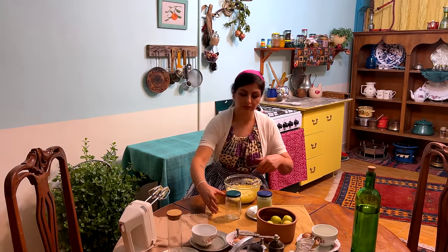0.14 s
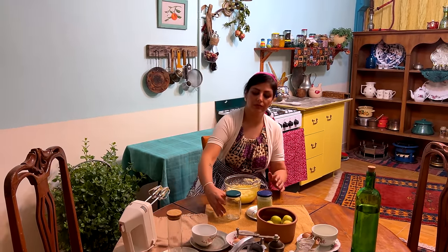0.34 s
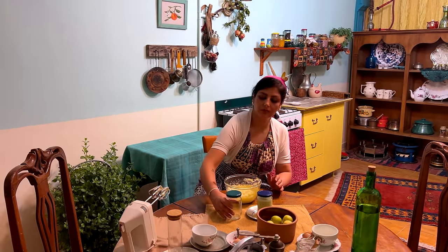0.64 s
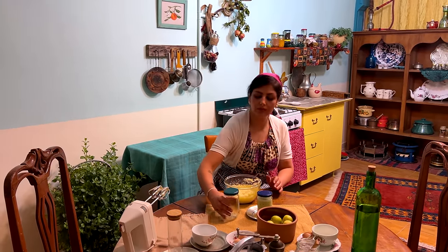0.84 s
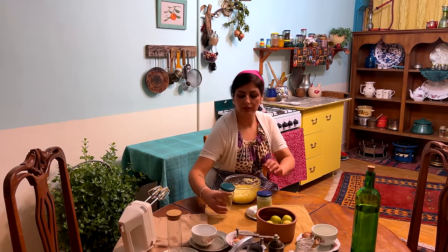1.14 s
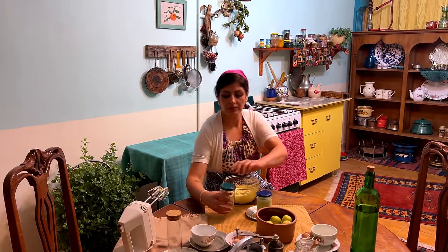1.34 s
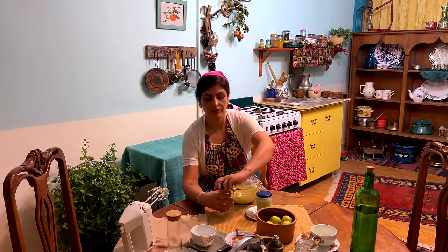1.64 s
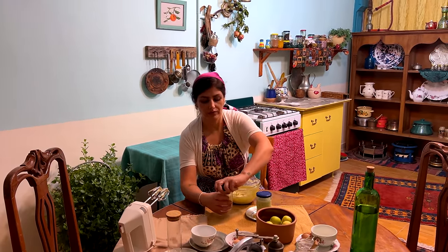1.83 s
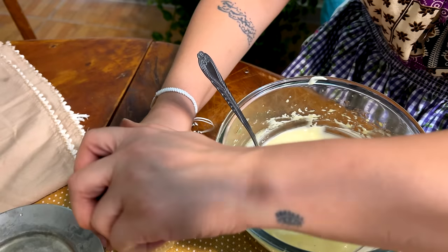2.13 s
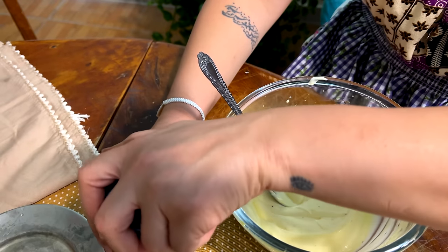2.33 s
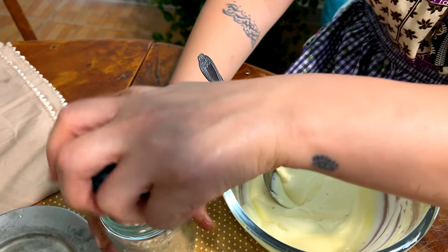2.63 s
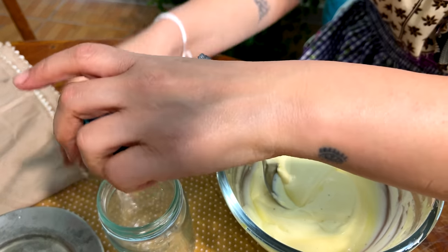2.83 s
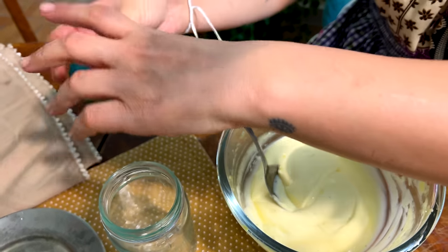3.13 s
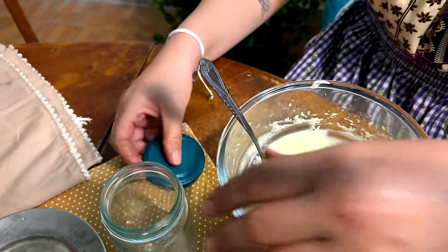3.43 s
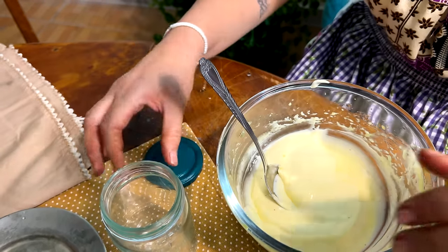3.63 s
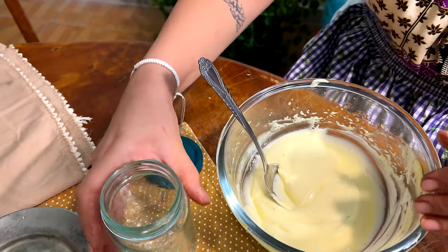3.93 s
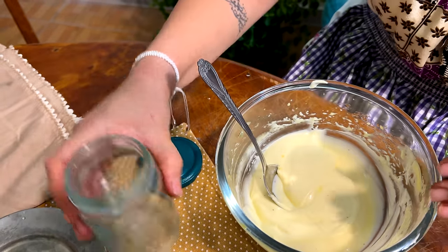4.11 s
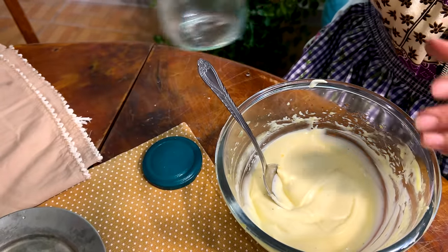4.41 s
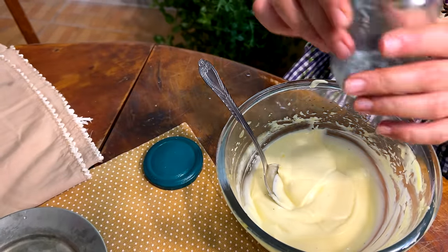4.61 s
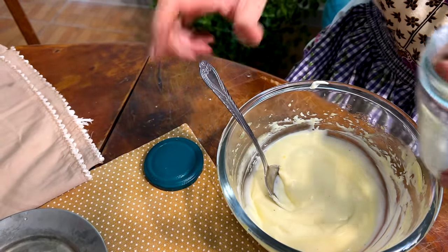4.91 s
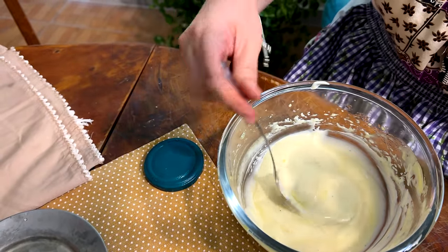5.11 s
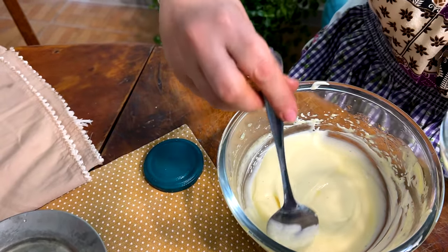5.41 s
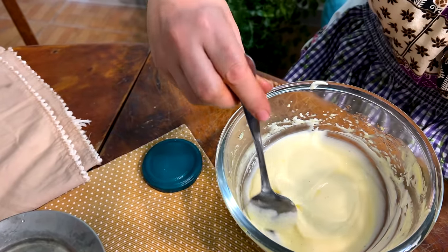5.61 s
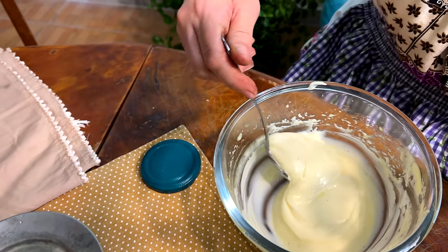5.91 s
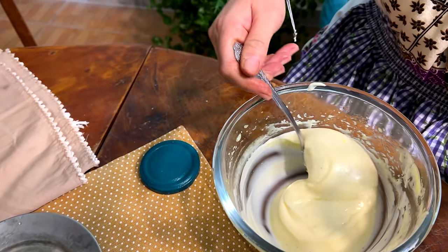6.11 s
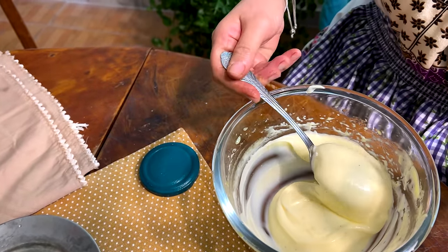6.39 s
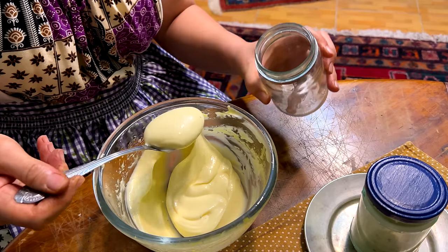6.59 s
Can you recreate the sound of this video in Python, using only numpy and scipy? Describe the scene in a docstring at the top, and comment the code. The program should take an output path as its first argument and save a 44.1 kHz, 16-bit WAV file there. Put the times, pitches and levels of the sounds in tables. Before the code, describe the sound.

A low, quiet room rumble runs throughout. From 0 to 1.9 s, smooth soft swishes swell and fade, the fullest around 0.75-1.4 s, with faint distant knocks at 0.1 and 0.4 s. Close up at about 2.0 s a tin lid rubs on a jar thread; slips and hollow low pops come at 2.17 and 2.27, strongest at 2.35-2.4 as the seal opens. At 2.46 a deep, loud thump of glass on wood, then a tiny squeak and light ticks near 3.1. At 3.4-3.57 the lid rasps, squeaks and taps down on the mat. Faint squeak at 4.05, soft sliding at 4.7, a small spoon stir at 5.05-5.15. At 5.47 the spoon clinks brightly but briefly on the bowl, then scrapes grittily from 5.5 to 6.25 with lesser taps at 5.68 and 5.9, turning thinner and brighter after 6.0. Near quiet follows, with one faint nudge at 6.6.

```python
"""In a kitchen a glass jar is twisted open, bumps the wooden table, and its tin lid is laid down.
A steel spoon then scrapes round a glass bowl and strikes it, damped by thick sauce.
Blows excite decaying modes, with noise for the rough surfaces; rubbing is noise through resonances.
The air in the jar rings as one mode, squeaks are wavering whistles, and a room tail follows most sounds.
Smooth swishes swell and fade at first; a low rumble of shaped noise lies under everything."""
import sys
import numpy as np
from scipy import signal
from scipy.fft import rfft, irfft, next_fast_len
from scipy.io import wavfile
from scipy.ndimage import uniform_filter1d, map_coordinates

SR = 44100
rng = np.random.default_rng(int(sys.argv[2]) if len(sys.argv) > 2 else 0)


def int16_out(signal):
    """Quantize to a 16-bit WAV file."""
    q = np.round(np.clip(np.atleast_2d(signal).T, -1, 1) * 32767)
    wavfile.write(sys.argv[1], SR, q.astype(np.int16))


N = 297675
TIME = np.arange(N) / SR  # s
AGE = TIME[:SR // 2]  # s since a blow; each blow is followed for half a second


def amp(db):
    """Level law: decibels to amplitude gain."""
    return 10 ** (np.asarray(db) / 20)


def unit(x):
    """Normalisation: x scaled to rms 1."""
    return x / np.sqrt(np.mean(x ** 2) + 1e-20)


def along(points, hz):
    """Logarithmic frequency scale: (Hz, value) points interpolated along it."""
    point_hz, values = np.transpose(points)
    return np.interp(np.log(hz + 1), np.log(point_hz + 1), values)


def wobble(rate):
    """Band-limited randomness: a smooth curve through random knots, rate of them a second."""
    knots = rng.standard_normal(int(N * rate / SR) + 4)
    return map_coordinates(knots, [TIME * rate])


def filtered(x, response):
    """Linear filtering: the spectrum of x times a response of frequency."""
    size = next_fast_len(N + SR // 2)
    hz = np.fft.rfftfreq(size, 1 / SR)
    return irfft(rfft(x, size) * response(hz), size)[:N]


def coloured(x, spectrum):
    """Spectral shaping: x with a (Hz, dB) spectrum, at rms 1."""
    return unit(filtered(x, lambda hz: amp(along(spectrum, hz))))


def resonated(x, peaks):
    """Forced resonance: x through (Hz, width Hz, dB) peaks of alternating sign, at rms 1."""
    def response(hz):
        total = 0
        for k, (centre, width, db) in enumerate(peaks):
            damping = 1j * hz * width
            total = total + (-1) ** k * amp(db) * damping / (centre ** 2 - hz ** 2 + damping)
        return total
    return unit(filtered(x, response))


def friction(rate, spread_db, smooth):
    """Stick-slip friction: tiny slips of uneven size, rate a second, over a share of smooth rubbing."""
    slip_here = rng.random(N) < rate / SR
    size = amp(spread_db * np.clip(rng.standard_normal(N), -2, 2))
    slips = slip_here * rng.choice([-1, 1], N) * size
    return unit(slips) + smooth * rng.standard_normal(N)


def shifting(x, patchy_db):
    """Changing contact: a slide stirs ever different resonances, as patches of gain that come and go."""
    z = signal.stft(x, nperseg=512)[2]
    field = uniform_filter1d(rng.standard_normal(z.shape), size=3, axis=0)  # over frequency
    field = uniform_filter1d(field, size=12, axis=1)  # over time
    return unit(signal.istft(z * amp(patchy_db * unit(field)), nperseg=512)[1][:N])


def stroke(start, length, db, attack_s, release_s, swell_db=0):
    """Amplitude envelope of a rub: it eases in, changes by swell_db over its length, dies 60 dB in release_s."""
    age = TIME - start
    ease_in = np.exp(np.minimum(age, 0) / attack_s)
    swell = swell_db * (np.clip(age / length, 0, 1) - 0.5)
    release = -60 * np.maximum(age - length, 0) / release_s
    return ease_in * amp(db + swell + release)


def ring(modes, tilt_db=0):
    """Modal decay: (Hz, dB, t60 s) modes of alternating sign, tilted by tilt_db an octave about 2500 Hz."""
    total = np.zeros(len(AGE))
    for k, (hz, db, t60) in enumerate(modes):
        decay = amp(db + tilt_db * np.log2(hz / 2500) - 60 * AGE / t60)
        total += (-1) ** k * decay * np.sin(2 * np.pi * hz * AGE)
    return total


def contact(low_hz, high_hz):
    """Contact time: one short push of peak 1; the softer the contact, the lower its band."""
    band = signal.butter(2, [low_hz, high_hz], 'bandpass', fs=SR, output='sos')
    push = signal.sosfilt(band, AGE == 0)
    return push / np.abs(push).max()


def crack(t60, top_hz=14000):
    """Surface roughness: a decaying burst of noise from the touching surfaces, dull above top_hz."""
    dull = signal.butter(2, top_hz, fs=SR, output='sos')
    return signal.sosfilt(dull, rng.standard_normal(len(AGE))) * amp(-60 * AGE / t60)


# Decay of the kitchen. Each row: frequency in Hz, time to fall 60 dB in seconds.
ROOM_DECAY = [(150, 0.66), (500, 0.58), (2000, 0.46), (5000, 0.42), (12000, 0.32)]
# Colour of the kitchen's answer. Each row: frequency in Hz, relative level in dB.
ROOM_COLOUR = [(100, -5), (350, -3), (800, -2), (2000, -4.5), (5000, -5), (12000, -11)]


def in_room(x, room_db):
    """Reverberation: x and the kitchen's diffuse answer, a noise tail whose treble dies first."""
    hz, t, z = signal.stft(rng.standard_normal(len(AGE)), SR, nperseg=256)
    decay_db = -60 * t / along(ROOM_DECAY, hz)[:, None]
    shaped = z * amp(along(ROOM_COLOUR, hz)[:, None] + decay_db)
    tail = signal.istft(shaped, SR, nperseg=256)[1][:len(AGE)]
    tail *= 1 - np.exp(-AGE / 0.0014)
    tail *= 1 + 1.3 * np.exp(-AGE / 0.013)  # table top and crockery answer first
    return x + amp(room_db) * signal.fftconvolve(x, tail / np.sqrt(SR * 0.027))[:len(x)]


def add(track, s, sound):
    """Superposition: mix a sound in at time s."""
    part = track[round(s * SR):][:len(sound)]
    part += sound[:len(part)]


# The smooth swishes. Each row: start in seconds, length in seconds, level in dB.
SWISH_STROKES = [(-.03, 0.22, -59), (0.46, 0.37, -58.5), (0.744, 0.62, -55.5), (1.627, .03, -61.5)]
# Their spectrum. Each row: frequency in Hz, relative level in dB.
SWISH_SPECTRUM = [(100, 4), (250, -15), (500, -5), (900, -7), (1600, -6), (2800, -10.5), (4500, -11),
                  (7000, -21), (10000, -29), (15500, -37)]
# Treble of the long swish. The one row: start in seconds, length in seconds, level in dB.
FIZZ_STROKE = (.72, 0.33, -64.5)
# Its spectrum. Each row: frequency in Hz, relative level in dB.
FIZZ_SPECTRUM = [(1500, -32), (4000, 2.5), (9000, -7.5), (15500, -19)]
# The room's rumble. Each row: frequency in Hz, relative level in dB.
RUMBLE_SPECTRUM = [(7, -14.5), (12, 8), (26, -14.5), (40, -18.5), (62, -17), (120, -30.5), (180, -32.5),
                   (330, -34), (510, -41.5), (850, -44.5), (1200, -50.5), (2200, -54), (15500, -64.5)]


def background(floor_db=-45.0):
    """Shaped noise: swishes swell and fade, the long one with added treble, over a steady low rumble."""
    strokes = [stroke(*row, attack_s=0.16, release_s=0.83, swell_db=-0.5) for row in SWISH_STROKES]
    swishes = np.max(strokes, axis=0) * coloured(rng.standard_normal(N), SWISH_SPECTRUM)
    fizz_gain = stroke(*FIZZ_STROKE, attack_s=0.17, release_s=1.2)
    fizz = fizz_gain * coloured(rng.standard_normal(N), FIZZ_SPECTRUM)
    rumble = amp(floor_db) * coloured(rng.standard_normal(N), RUMBLE_SPECTRUM)
    return swishes + fizz + rumble


# Modes of the table boards. Each row: frequency in Hz, relative level in dB, time to fall 60 dB in seconds.
TABLE_MODES = [(61.7, 2.5, 0.94), (147.8, 3, 0.483), (213, -9.5, 0.29), (276, -3, 0.21), (324, -1, 0.32),
               (370, -3, 0.64), (425, -7.5, 0.5), (477, -11, 0.31), (566, -12, 0.48), (602, -3, 0.26)]


def thud(low_hz, high_hz, ring_db, grit_db, room_db):
    """Impulse response: one dull push on the table, whose boards ring on."""
    cushion = signal.butter(4, high_hz * 2.17, fs=SR, output='sos')  # the mat softens each blow
    push = signal.sosfilt(cushion, contact(low_hz, high_hz))
    boards = amp(ring_db) * ring(TABLE_MODES)
    grit = amp(grit_db) * crack(t60=0.07, top_hz=high_hz * 2.9)
    return in_room(push + boards + grit, room_db)


# Blows on the table. Each row: start in seconds, level in dB, lower band edge in Hz, upper band edge in Hz,
# room answer in dB relative to the blow.
TABLE_BLOWS = [(0.119, -30.5, 200, 378, 10), (.423, -43, 197, 1400, 10), (2.4608, -11.5, 56.5, 438, -5),
               (3.406, -41, 110, 800, 4), (3.5545, -33.5, 101, 233, -2.5), (3.5662, -24.5, 527, 880, -6),
               (5.155, -42, 810, 1000, -10.5), (6.619, -45, 648, 1000, -11.5)]
TABLE_DB, TABLE_DB_PER_OCT = -29, -2.5  # ring of the boards under a 300 Hz push; softer pushes stir them more
GRIT_DB, GRIT_DB_PER_OCT, GRIT_PER_ROOM = -14.5, 4.5, 1  # grit grows with hardness and with distance


def knocks():
    """Impact hardness: soft blows on the table boom, hard and distant ones are grittier."""
    out = np.zeros(N)
    for s, db, low_hz, high_hz, room_db in TABLE_BLOWS:
        hardness = np.log2(low_hz / 300)  # octaves
        ring_db = TABLE_DB + TABLE_DB_PER_OCT * hardness
        grit_db = GRIT_DB + GRIT_DB_PER_OCT * hardness + GRIT_PER_ROOM * room_db
        add(out, s, amp(db) * thud(low_hz, high_hz, ring_db, grit_db, room_db))
    return out


# Small dry ticks of fingers, lid and glass. Each row: start in seconds, level in dB,
# lower band edge in Hz, upper band edge in Hz.
LIGHT_TOUCHES = [(1.968, -46, 2000, 4080), (2.478, -34, 2950, 7450), (3.064, -41.5, 1600, 3440),
                 (3.0971, -40.5, 700, 4100), (3.4786, -42, 3500, 9000), (3.5537, -26.5, 1100, 8150),
                 (5.1560, -45.5, 2500, 7000), (5.5986, -40, 3000, 9600)]


def ticks(room_db=-5):
    """Short contact: light touches too brief to ring, each a push roughened by a little noise."""
    out = np.zeros(N)
    for s, db, low_hz, high_hz in LIGHT_TOUCHES:
        roughness = (AGE == 0) + 0.12 * crack(t60=0.026)
        touch = signal.fftconvolve(contact(low_hz, high_hz), roughness)[:len(AGE)]
        add(out, s, amp(db) * in_room(touch, room_db))
    return out


# Turns of the lid. Each row: start in seconds, length in seconds, thread level in dB, jar air level in dB.
LID_TURNS = [(1.976, .1, -58.5, -66.5), (2.238, 0.11, -59, -47.5), (2.344, 0.12, -56, -72)]
# Colour of the rubbing thread. Each row: frequency in Hz, relative level in dB.
THREAD_SPECTRUM = [(150, -23.5), (330, 7.5), (520, -2.5), (680, -2), (830, 8), (1000, -5), (1400, -8.5),
                   (2050, 3), (2600, -3), (3500, -8), (5000, -15), (11000, -35.5), (16000, -46.5)]


def twisting():
    """Sliding friction: the lid rubs round its thread and stirs the resonant air in the jar."""
    rubbing = shifting(friction(rate=710, spread_db=9.5, smooth=1.35), patchy_db=3.0)
    thread_gain, air_gain = np.zeros(N), np.zeros(N)
    for s, length, thread_db, air_db in LID_TURNS:
        thread_gain += stroke(s, length, thread_db, attack_s=0.0089, release_s=0.5, swell_db=1)
        air_gain += stroke(s, length, air_db, attack_s=0.012, release_s=0.18, swell_db=-4.5)
    air = resonated(rng.standard_normal(N), [(327, 34, 0)])
    return thread_gain * coloured(rubbing, THREAD_SPECTRUM) + air_gain * air


# Slips and pops of the lid. Each row: start in seconds, tin level in dB, brightness in dB per octave
# (also added in dB to the noise of the slip), jar air level in dB.
LID_POPS = [(2.0651, -46, 0, -62), (2.1715, -26, -1.5, -23), (2.2706, -41.5, 1, -44),
            (2.3471, -30.5, 13.5, -19), (2.3685, -24, -5.5, -15), (2.392, -39, 1, -34.5),
            (2.413, -38, 8.5, -59.5)]
# Modes of the tin lid. Each row: frequency in Hz, relative level in dB, time to fall 60 dB in seconds.
TIN_MODES = [(522, -3.5, 0.0143), (583, 5, 0.0078), (896, -3, 0.0081), (1776, -12.5, 0.12),
             (1880, 7, 0.011), (2098, 5.5, 0.027), (2135, 5.5, 0.011), (2417, -3, 0.021), (2680, -13, .014),
             (3220, -5.5, 0.018), (3480, -20, 0.17), (2890, -43, .9), (3950, -10.5, 0.022),
             (4610, -14, 0.011), (7100, -38, 0.11), (9400, -37, 0.027), (10670, -43.5, .08)]
SEAL_GIVES_S, SEAL_OPEN_S = 2.2, 2.352
SHUT_HZ, OPEN_HZ = 313, 376.6  # the air in the jar, sealed and open
SHUT_T60, OPEN_T60 = 0.052, 0.12  # its decay, s


def lid(crack_db=-11, room_db=-8, crack_room_db=-2, leak_hz=210):
    """Cavity resonance: lugs slip, tin rings and the jar's air pops, higher and longer once the seal is open."""
    out = np.zeros(N)
    mouth = signal.butter(2, leak_hz, 'highpass', fs=SR, output='sos')  # a small jar radiates little bass
    for s, tin_db, tilt_db, air_db in LID_POPS:
        air_hz = np.interp(s, [SEAL_GIVES_S, SEAL_OPEN_S], [SHUT_HZ, OPEN_HZ])
        air_t60 = np.interp(s, [SEAL_GIVES_S, SEAL_OPEN_S], [SHUT_T60, OPEN_T60])
        tin = in_room(ring(TIN_MODES, tilt_db), room_db)
        snap = amp(crack_db + tilt_db) * in_room(crack(t60=0.026, top_hz=7000), crack_room_db)
        air = in_room(ring([(air_hz, air_db, air_t60)]), room_db=-13)
        add(out, s, signal.sosfilt(mouth, amp(tin_db) * (tin + snap) + air))
    return out


# Fingers squeak on the jar, the lid on the mat. Each row: start in seconds, length in seconds,
# level in dB, mean pitch in Hz.
SQUEAK_STROKES = [(2.69, 0.11, -71, 2260), (3.413, 0.05, -56, 2040), (4.044, .012, -70, 2260),
                  (4.067, 0.025, -59.5, 2260)]
# Resonances of the rasp. Each row: frequency in Hz, width in Hz, relative level in dB.
RASP_PEAKS = [(2260, 81, 3), (2880, 110, -3.5), (3500, 220, -6), (4500, 164, -7.5)]


def squeaks(waver=0.0219, tone_db=-3, rasp_db=-3):
    """Stick-slip oscillation: skin and tin give a wavering whistle with a rasp round it."""
    out = np.zeros(N)
    for s, length, db, hz in SQUEAK_STROKES:
        pitch = hz * (1 + waver * wobble(350))
        whistle = unit(np.sin(2 * np.pi * np.cumsum(pitch) / SR))
        rasp = resonated(rng.standard_normal(N), RASP_PEAKS)
        gain = stroke(s, length, db, attack_s=0.002, release_s=0.1, swell_db=-2)
        out += gain * (amp(tone_db) * whistle + amp(rasp_db) * rasp)
    return out


# Skin and lid slide. Each row: start in seconds, length in seconds, level in dB.
SLIDE_STROKES = [(3.318, 0.1, -66), (3.44, 0.096, -57.5), (4.656, 0.013, -67.5), (4.727, 0.064, -64.5),
                 (5.09, .06, -71.5), (5.268, 0.024, -76)]
# Their colour. Each row: frequency in Hz, relative level in dB.
SLIDE_SPECTRUM = [(500, -40), (900, -5), (1500, -16.5), (2000, -14.5), (2900, -10), (4000, -6),
                  (5500, -8.5), (9000, -13.5), (15500, -17.5)]
# The lid drags over the mat. The one row: start in seconds, length in seconds, level in dB.
DRAG_STROKE = (3.414, 0.13, -56.5)
# Resonances of the dragged lid. Each row: frequency in Hz, width in Hz, relative level in dB.
DRAG_PEAKS = [(750, 65, -3), (1400, 130, -8), (2040, 124, 3.5), (3800, 280, -16)]


def handling():
    """Friction noise: fingers and lid slide, each movement growing; the lid's rim rasps over the mat and fades."""
    slide_gain = sum(stroke(*row, attack_s=0.014, release_s=0.083, swell_db=7) for row in SLIDE_STROKES)
    sliding = shifting(friction(rate=1100, spread_db=5.5, smooth=0.7), patchy_db=3.5)
    rubbing = shifting(friction(rate=400, spread_db=2.5, smooth=0.64), patchy_db=0.0)
    drag_gain = stroke(*DRAG_STROKE, attack_s=0.0081, release_s=0.074, swell_db=-11)
    return slide_gain * coloured(sliding, SLIDE_SPECTRUM) + drag_gain * resonated(rubbing, DRAG_PEAKS)


# The spoon is lifted and stirs against the bowl. The one row: start in seconds, length in seconds, level in dB.
PICKUP_STROKE = (5.054, 0.089, -59)
# Resonances of that stir. Each row: frequency in Hz, width in Hz, relative level in dB.
PICKUP_PEAKS = [(365, 50, 7.5), (700, 200, -8.5), (950, 250, -12), (1650, 120, -17)]
# Pressure of the spoon, one run of points before and one after it skips. Each row: time in seconds,
# pressure in dB before the overall drag gain.
PRESSURE_RUNS = [
    [(5.51, -56.5), (5.592, -57), (5.602, -49), (5.662, -60), (5.675, -48.5)],
    [(5.712, -51.5), (5.718, -53.5), (5.894, -54.5), (5.898, -51.5), (6.026, -59.5), (6.092, -52.5),
     (6.144, -59), (6.154, -52.5), (6.176, -67), (6.184, -54), (6.194, -63), (6.234, -60.5), (6.28, -87)],
]
# Spoon flat on the glass. Each row: frequency in Hz, width in Hz, relative level in dB.
FLAT_PEAKS = [(397, 45, 4), (670, 140, 3.5), (900, 240, 1.5), (1400, 150, 0), (2300, 400, -1.5),
              (3450, 600, -2.5), (4900, 800, -5), (7350, 650, -5.5), (8500, 900, -10.5), (11800, 2200, -20),
              (14800, 1800, -22.5)]
# Spoon on its edge. Each row: frequency in Hz, width in Hz, relative level in dB.
EDGE_PEAKS = [(700, 500, 0.5), (1100, 540, 3), (2100, 520, -0.5), (3850, 320, -1), (4900, 520, 2.5),
              (5700, 560, -1), (7750, 800, -12), (9300, 600, -13), (10250, 260, -8), (12400, 900, -14),
              (14500, 1300, -15.5)]
# The spoon judders on the glass. Each row: start in seconds, length in seconds, level in dB.
JUDDER_STROKES = [(5.836, 0.0096, -44.5), (5.896, 0.037, -52)]
# Resonances of the judder. Each row: frequency in Hz, width in Hz, relative level in dB.
JUDDER_PEAKS = [(1400, 85, -0.5), (2100, 120, -1), (2260, 135, -3.5)]
# The spoon starts nearly flat (0), then rolls onto its edge (1).
FLAT_TILT, TURN_START_S, TURN_END_S = 0.17, 5.98, 6.03


def scrape(gritty_db=2.0, drag_db=1.0):
    """Friction-driven resonance: lifted, the spoon drags in gritty bursts; its peaks shift as it turns on edge."""
    pressure = np.zeros(N)
    for run in PRESSURE_RUNS:
        run_db = np.interp(TIME, *np.transpose(run), left=-np.inf, right=-np.inf)  # silent outside the run
        pressure += amp(drag_db + run_db)
    turn = np.interp(TIME, [TURN_START_S, TURN_END_S], [FLAT_TILT, 1]) * np.pi / 2  # radians
    slips = shifting(friction(rate=520, spread_db=4.5, smooth=0.59), patchy_db=3.0)
    slips = slips * amp(gritty_db * wobble(110))
    drag = pressure * (np.cos(turn) * resonated(slips, FLAT_PEAKS) + np.sin(turn) * resonated(slips, EDGE_PEAKS))
    judder_gain = sum(stroke(*row, attack_s=0.0086, release_s=0.155) for row in JUDDER_STROKES)
    judder = judder_gain * resonated(rng.standard_normal(N), JUDDER_PEAKS)
    pickup_gain = stroke(*PICKUP_STROKE, attack_s=0.0011, release_s=0.12, swell_db=-3.5)
    pickup = pickup_gain * resonated(rng.standard_normal(N), PICKUP_PEAKS)
    return in_room(drag + judder + pickup, room_db=-6.5)


# The spoon meets the bowl. Each row: start in seconds, clink level in dB before the common clink gain,
# brightness in dB per octave (also added in dB to the click), thud into the table in dB.
SPOON_TAPS = [(5.4686, -15.5, 0.8, -25.5), (5.6825, -33.5, -0.5, -34), (5.7065, -44, 0, -37),
              (5.9003, -43.5, 1, -34.5), (6.0499, -50, 0, -67), (6.1533, -47.5, -0.5, -59),
              (6.1849, -45, -2.5, -51)]
# Modes of spoon and sauce-damped bowl. Each row: frequency in Hz, relative level in dB,
# time to fall 60 dB in seconds.
BOWL_MODES = [(727, -13, 0.047), (1642, -12, 0.029), (1580, -28, 0.47), (1950, -14, 0.018),
              (2460, -2, 0.021), (2680, -35, 0.3), (2800, -4.5, 0.016), (3280, -5.5, .014),
              (4240, 5.5, 0.0049), (4586, 7, 0.01), (4720, -20, .02), (4320, -29.5, 0.12),
              (5430, 0.5, 0.015), (5470, -15.5, 0.015), (5670, -11, 0.011), (7300, -15, 0.038),
              (7270, -7, .015), (8240, -6, 0.013), (8070, -5.5, 0.017), (8860, -5.5, 0.012),
              (10680, -27, 0.0066), (12790, -16, 0.012), (13840, -18, .009), (14650, -18, 0.00807)]
THUD_LOW_HZ, THUD_HIGH_HZ, THUD_ROOM_DB, THUD_RING_DB = 520, 1000, -0.5, -21.5


def taps(clink_db=-4.0, crack_db=-9, room_db=-12, crack_room_db=-4, grit_db=-32):
    """Damped vibration: spoon strikes glass, bowl nudges table; sauce and hand stop most modes in milliseconds."""
    out = np.zeros(N)
    for s, db, tilt_db, thud_db in SPOON_TAPS:
        clink = in_room(ring(BOWL_MODES, tilt_db), room_db)
        click = amp(crack_db + tilt_db) * in_room(crack(t60=0.033, top_hz=10600), crack_room_db)
        nudge = thud(THUD_LOW_HZ, THUD_HIGH_HZ, THUD_RING_DB, grit_db, THUD_ROOM_DB)
        add(out, s, amp(db + clink_db) * (clink + click))
        add(out, s, amp(thud_db) * nudge)
    return out


def scene():
    """Superposition: all sources add at one microphone."""
    jar = knocks() + ticks() + twisting() + lid() + squeaks() + handling()
    bowl = scrape() + taps()
    return (background() + jar + bowl)[None]


TOP_HZ = 15850


def record(dry):
    """Band limiting: the recorder keeps nothing above TOP_HZ."""
    return np.array([filtered(channel, lambda hz: hz < TOP_HZ) for channel in dry])


dry = scene()
out = record(dry)
int16_out(out)
```